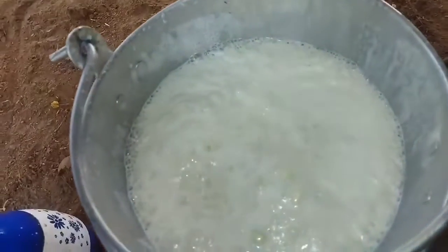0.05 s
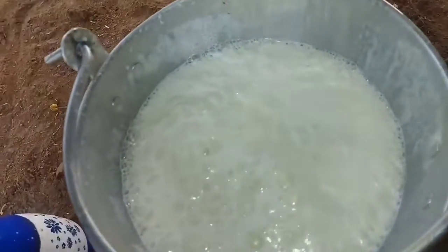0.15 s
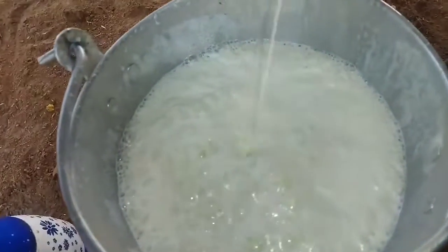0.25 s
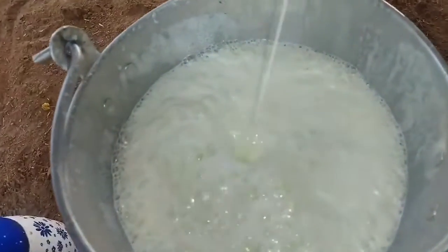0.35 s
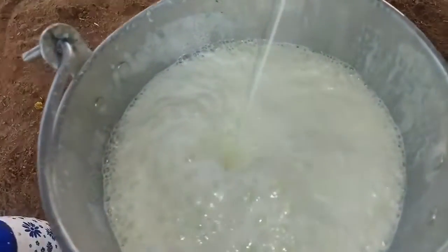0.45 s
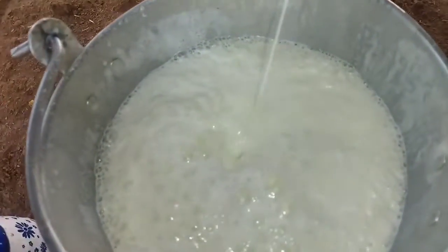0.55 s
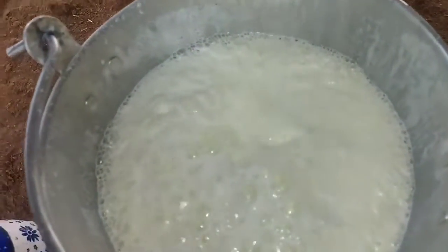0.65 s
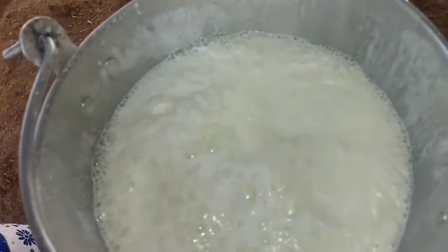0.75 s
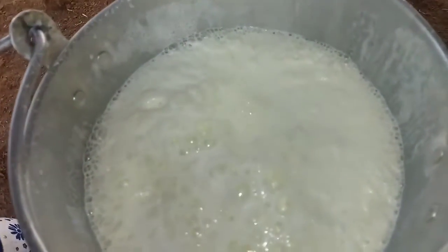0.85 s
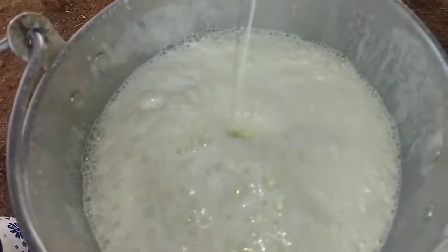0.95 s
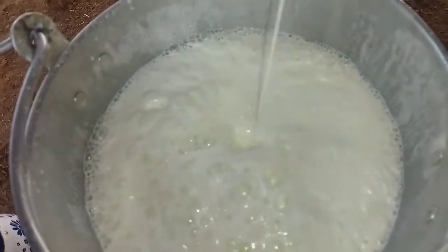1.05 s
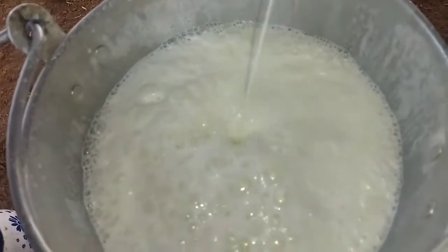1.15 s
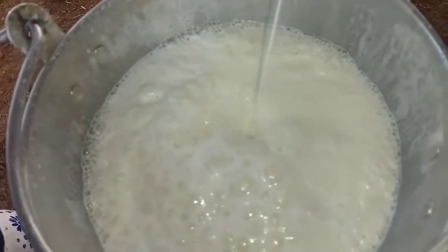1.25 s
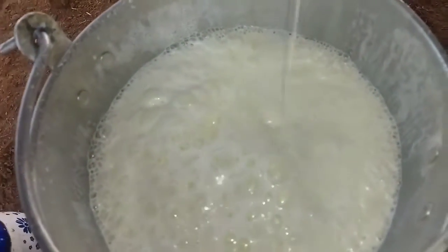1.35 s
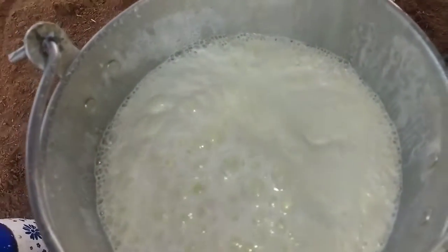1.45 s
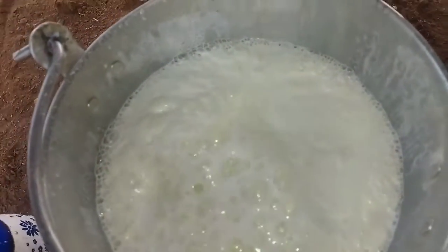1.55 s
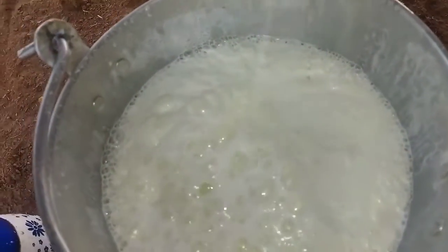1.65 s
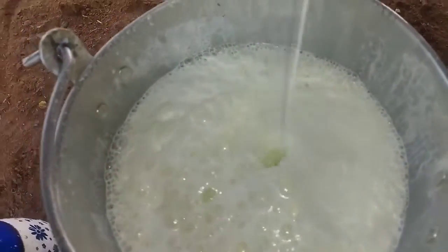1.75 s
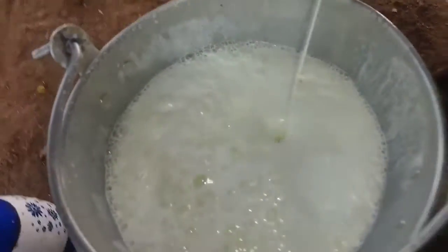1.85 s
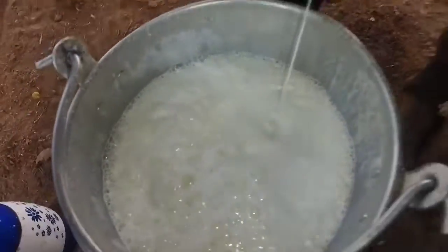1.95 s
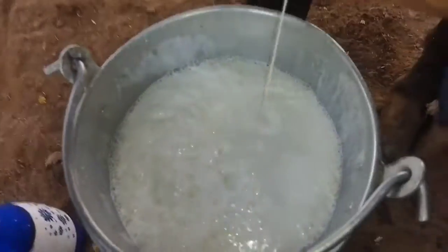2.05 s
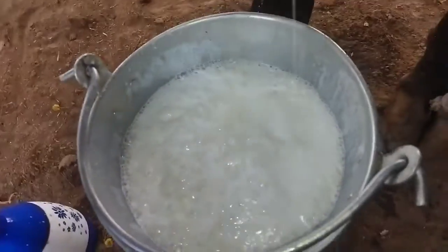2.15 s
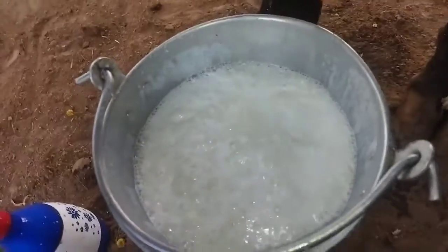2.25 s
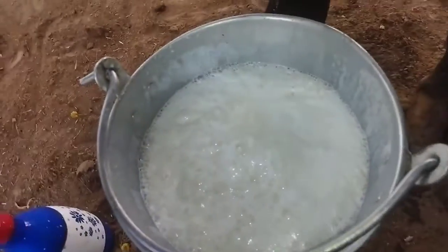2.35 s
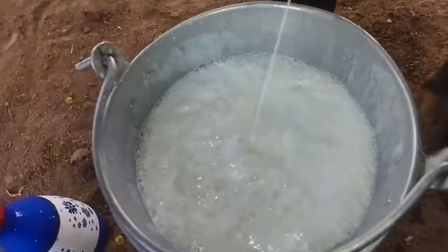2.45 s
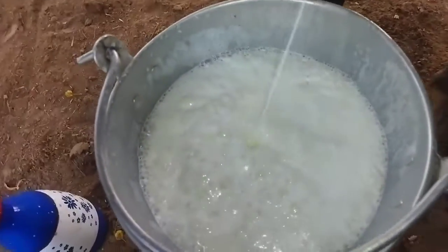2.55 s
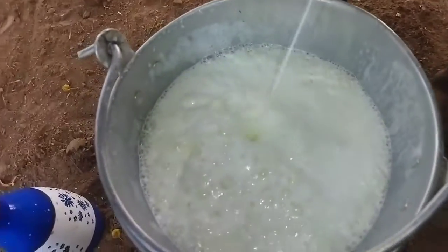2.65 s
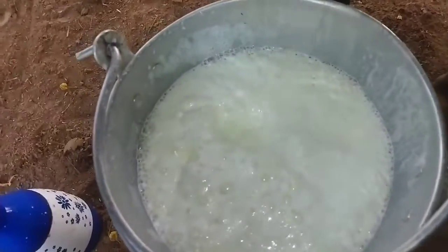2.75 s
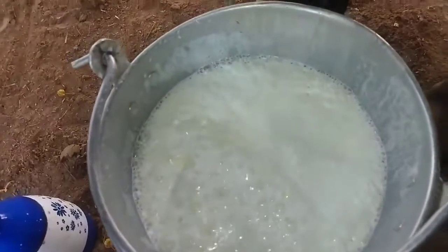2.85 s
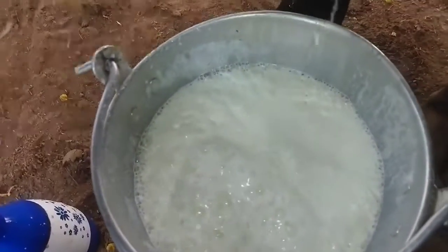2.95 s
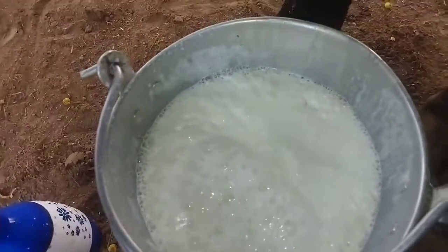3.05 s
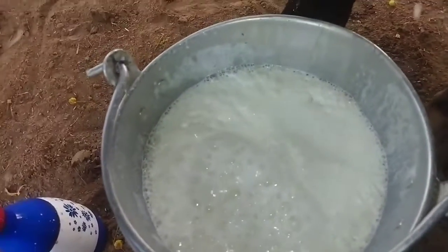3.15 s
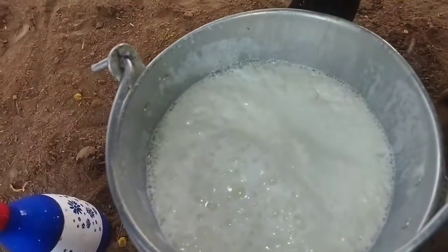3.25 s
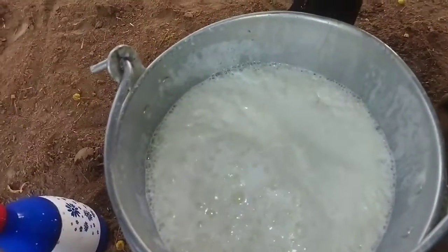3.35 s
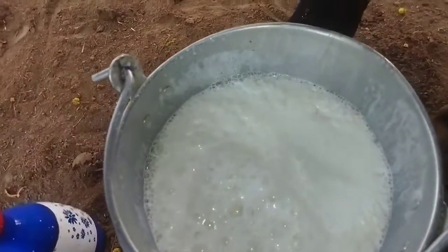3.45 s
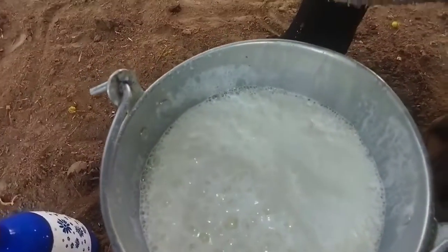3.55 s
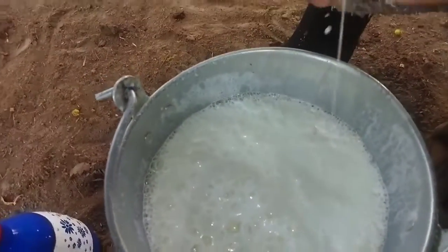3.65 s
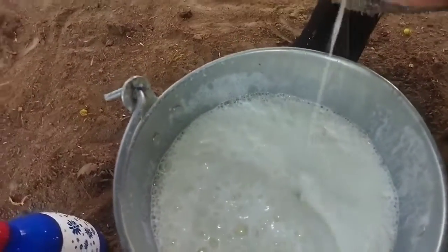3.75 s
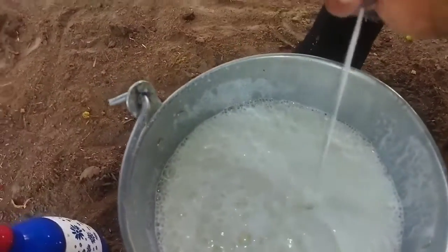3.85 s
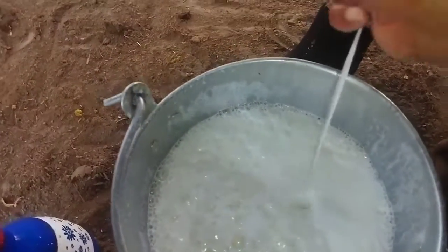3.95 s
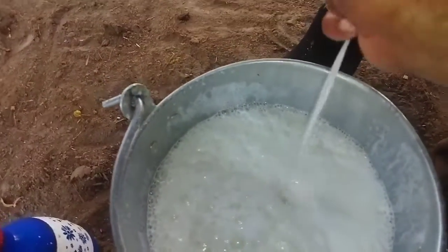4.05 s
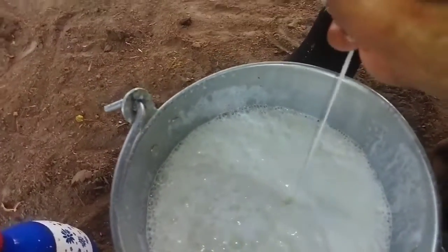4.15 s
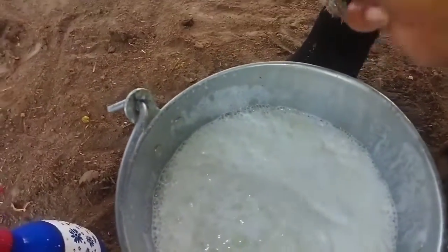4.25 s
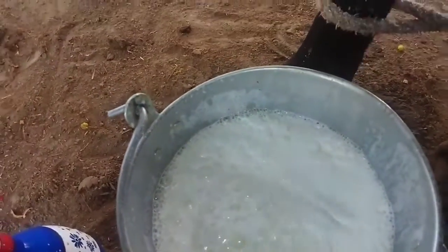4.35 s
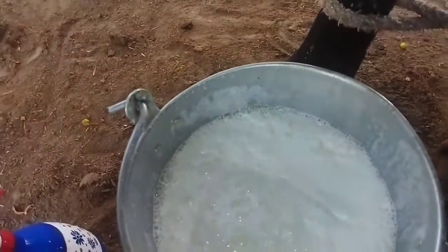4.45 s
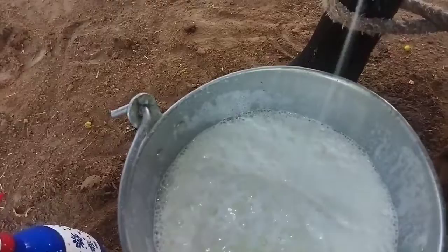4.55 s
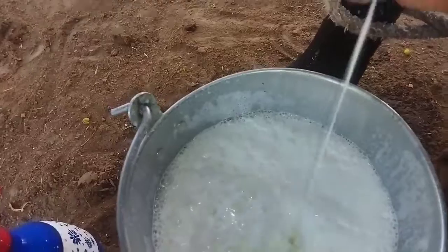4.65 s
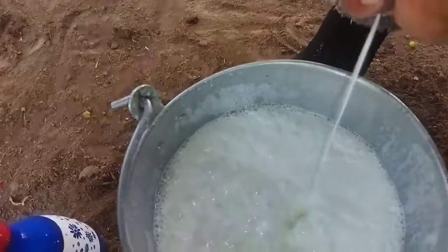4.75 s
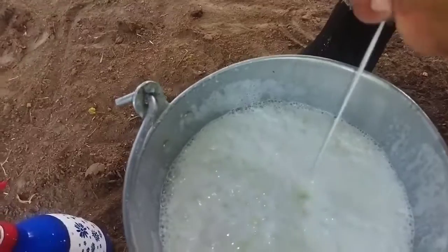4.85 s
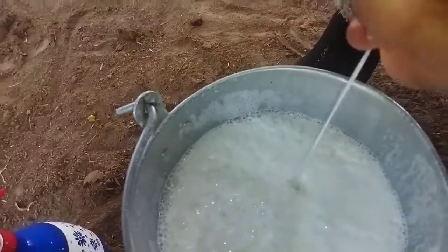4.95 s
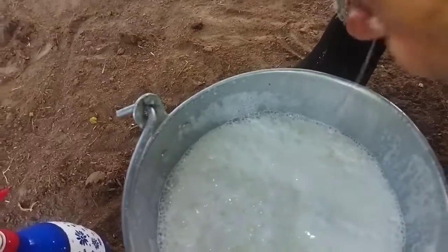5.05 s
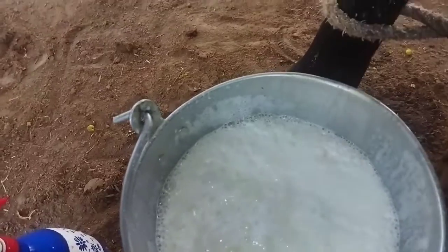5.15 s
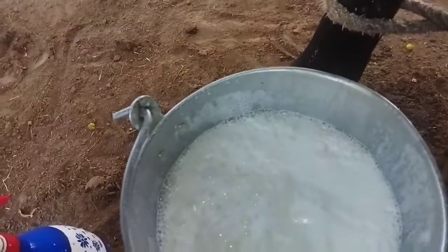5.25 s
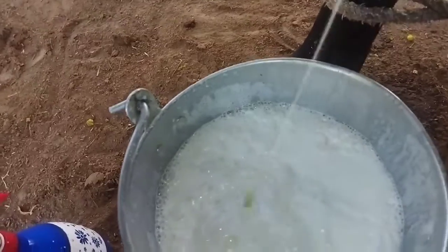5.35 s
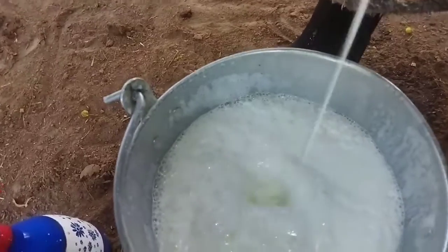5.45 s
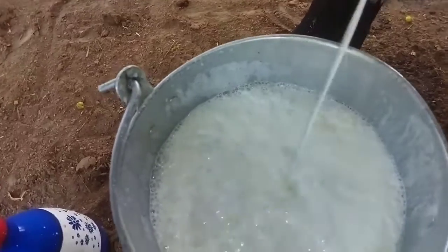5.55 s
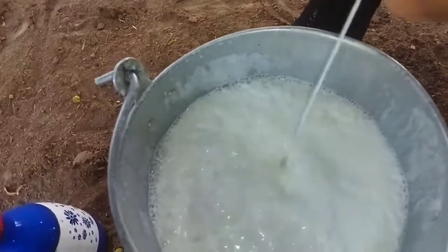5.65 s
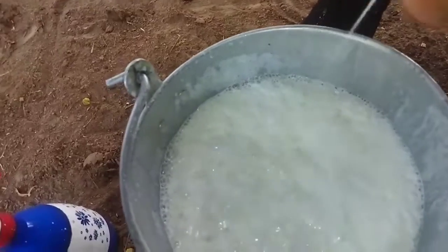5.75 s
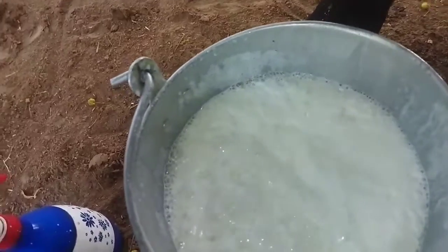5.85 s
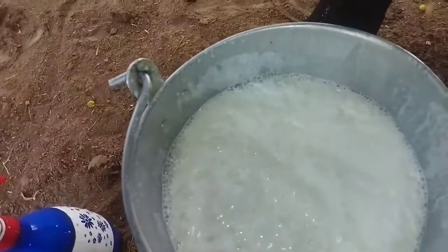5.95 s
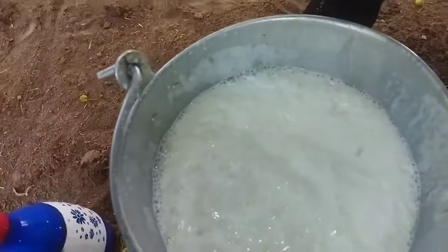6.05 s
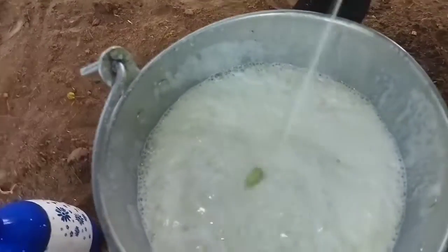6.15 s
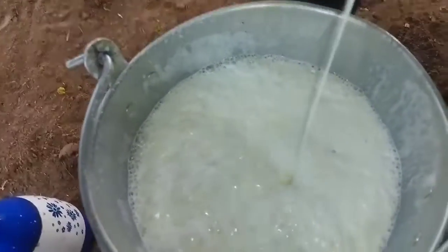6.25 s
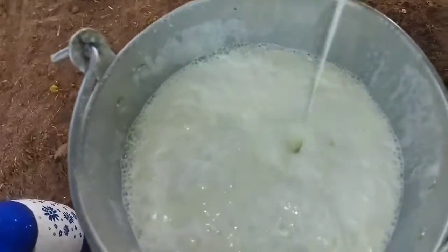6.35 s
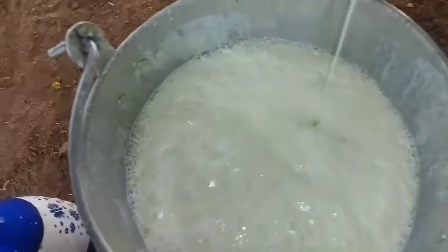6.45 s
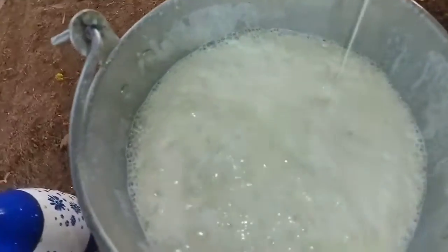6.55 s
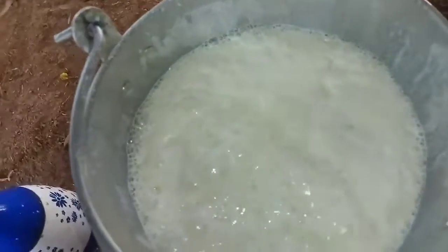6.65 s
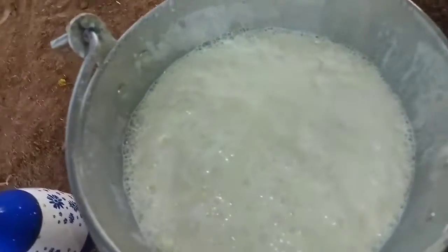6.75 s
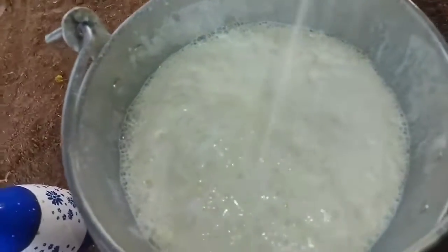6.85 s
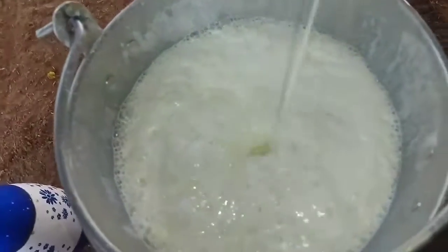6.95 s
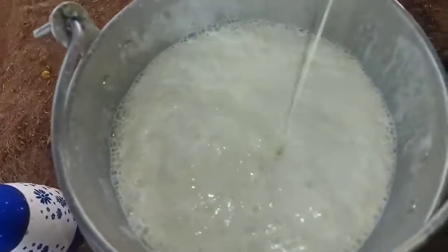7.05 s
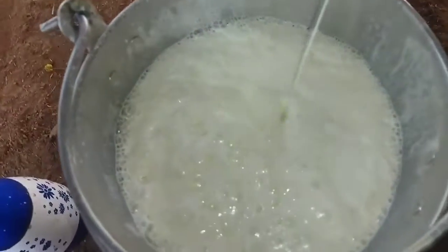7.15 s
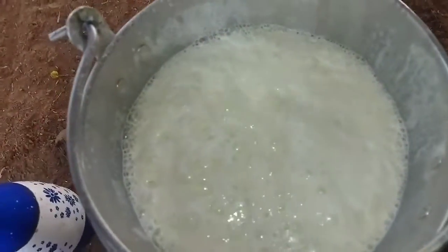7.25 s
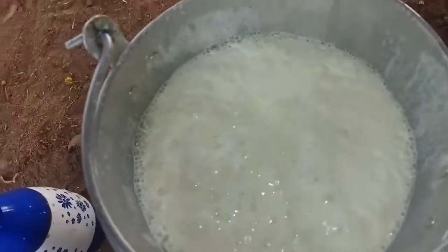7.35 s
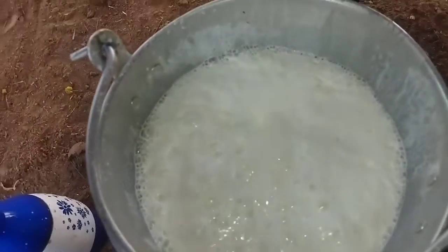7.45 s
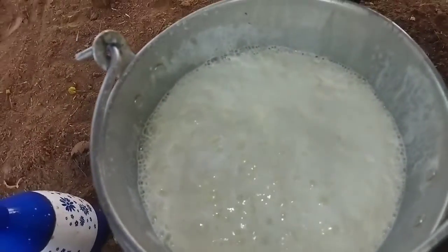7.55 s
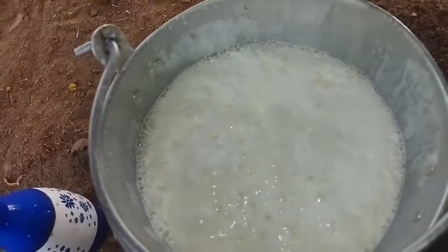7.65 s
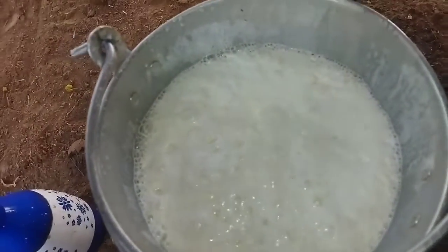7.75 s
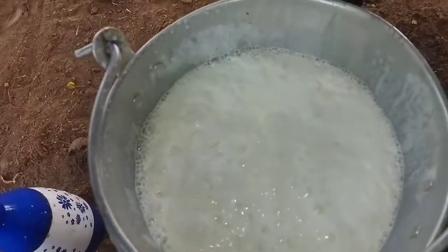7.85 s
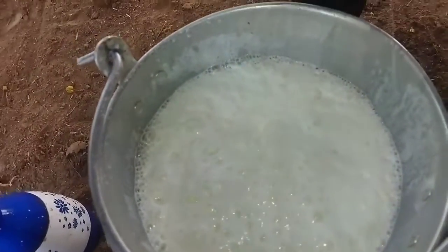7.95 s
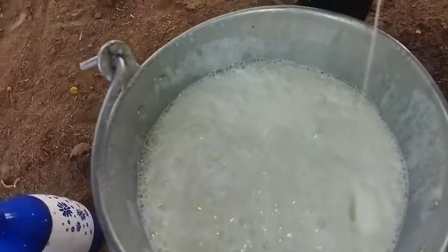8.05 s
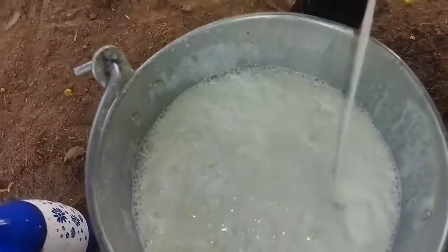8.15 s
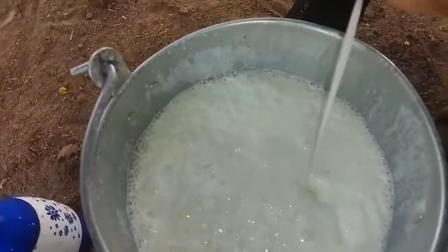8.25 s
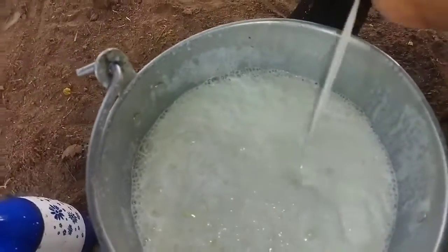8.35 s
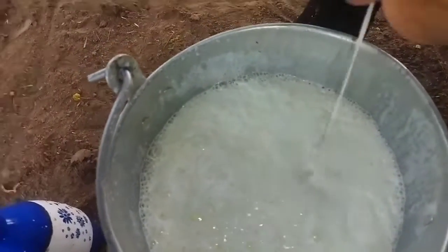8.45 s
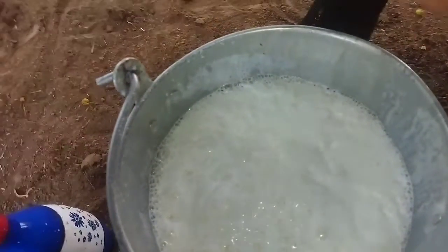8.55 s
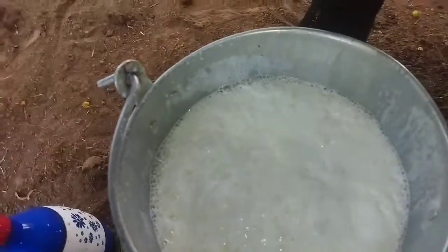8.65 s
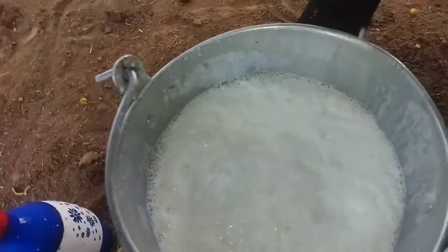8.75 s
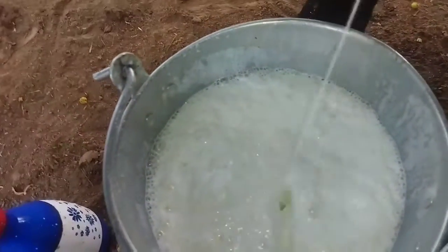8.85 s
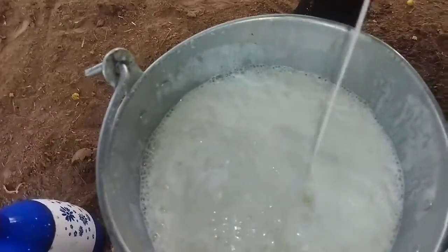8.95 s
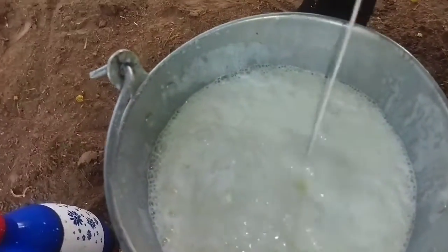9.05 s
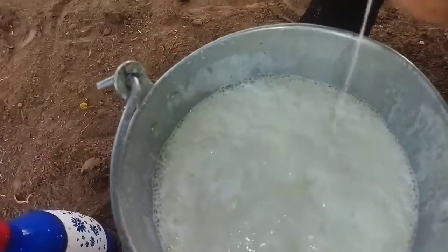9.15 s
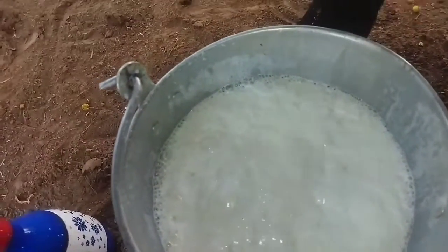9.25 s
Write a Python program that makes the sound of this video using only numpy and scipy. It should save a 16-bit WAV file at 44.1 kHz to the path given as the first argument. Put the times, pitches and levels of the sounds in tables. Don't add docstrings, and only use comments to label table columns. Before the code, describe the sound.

Steady hand milking heard right over a foam-filled pail outdoors. Each squirt starts with a small splat, swells into hissing spray and hollow bubbling, then stops abruptly, leaving soft crackle and knocks of froth. Two longer pauses break the rhythm. Behind it are soft air hiss, a faint distant engine throb, barely audible bird whistles and one short far-off low from a cow.

```python
import sys
import numpy as np
from scipy import signal
from scipy.fft import rfft, irfft
from scipy.io import wavfile
from scipy.ndimage import uniform_filter1d

SR = 44100
rng = np.random.default_rng(int(sys.argv[2]) if len(sys.argv) > 2 else 0)


def voltage_ratio(decibels):
    exponent = np.asarray(decibels, float) / 20
    return 10 ** exponent


def materialize(psi):
    bounded = np.clip(np.atleast_2d(psi).T, -1, 1)
    quanta = np.round(bounded * 32767).astype(np.int16)
    wavfile.write(sys.argv[1], SR, quanta)


N = 409688
T = np.arange(N) / SR

# [t/s, firings per second/Hz]
ENGINE_SPEED = [(0.0, 20.73), (0.8, 20.0), (1.6, 18.42), (2.4, 18.62), (3.2, 18.96), (4.0, 18.66),
                (4.8, 18.66), (5.6, 19.16), (6.2, 18.83), (6.8, 19.83), (7.4, 21.3), (8.0, 20.62),
                (8.6, 19.89), (9.3, 19.37)]
FIRST_TURN = -.54
# [f/Hz, level/dB]
YARD_SPECTRUM = [(24, -56), (40, -40), (146, 6), (408, -12.5), (578, -16), (953, -11), (1160, -13.5),
                 (1780, -15), (2400, -17), (3670, -15.5), (7020, -26), (7560, -28.5), (11900, -26.5),
                 (15600, -21.5)]
YARD_DB = -53.5
# [f/Hz, correlation]
YARD_LIKENESS = [(40, 0.51), (120, 0.94), (240, 0.98), (950, 0.21), (3770, 0.025), (15000, 0.13)]
# [start t/s, length/s, f/Hz, level/dB, blur/Hz]
CHIRPS = [
    (3.192, 0.16, 2700, -66, 60),
    (3.578, 0.049, 1920, -55.5, 500),
    (5.965, 0.099, 3500, -57, 80.4),
]
# [t/s, f/Hz, level/dB]
COW_LOW = [
    (7.69, 234, -72),
    (7.708, 236, -50),
    (7.894, 269, -48.5),
    (7.96, 260, -56),
]
# [t/s, level/dB]
RUSTLE = [
    (3.45, -82),
    (3.724, -41),
    (3.774, -88),
    (3.79, -68),
]
# [t/s, level/dB]
SLOSH = [(.89, -48), (1.63, -44.5), (2.35, -78), (3.07, -57), (3.37, -38), (3.55, -56), (4.7, -69),
         (5.46, -42.5), (6.01, -42), (6.11, -43.5), (6.85, -39), (6.9, -32), (6.988, -48), (7.442, -49),
         (8.74, -43.5), (8.88, -43.5)]
LURCH_DB_PER_S, SETTLE_DB_PER_S = 300, 95
# [t/s, peak level/dB, bubble f/Hz, splat level/dB re peak]
SLUGS = [(0.381, -16.5, 929, 1), (0.408, -17, 700, -22), (1.11, -6.5, 750, -14.5), (1.142, -10.5, 660, -23),
         (1.872, -22, 1300, -16), (1.972, -19.5, 355, -8), (2.104, -21, 890, -7), (2.581, -31, 930, 13.5),
         (2.616, -15.5, 390, -7), (3.346, -30.5, 455, -32), (3.389, -39, 382, -28), (3.911, -32.5, 383, -8),
         (4.414, -22.5, 891, -45), (5.14, -29, 300, 12), (5.568, -16.5, 420, -20), (5.596, -5.5, 970, -24),
         (6.345, -23, 820, 1), (6.558, -13, 838, -24), (7.082, -13, 926, -2.5), (7.385, -44, 956, 20),
         (7.438, -28.5, 1200, -16), (8.233, -37, 690, 10), (9.025, -35, 710, 3), (9.044, -24, 440, 12.5),
         (9.067, -21, 387, -23)]
TICK_DB, TICK_HZ, TICK_SPLAT_DB, SLOW_START_S = 12.5, 960, 8, .029
# [first drop t/s, thin thread lasts/s]
JETS = [(-.35, .05), (.323, .052), (1.071, .038), (1.823, .05), (2.555, .06), (3.787, .124), (4.732, .055),
        (5.507, .058), (6.284, .04), (7.033, .047), (8.138, .094), (9.001, .041)]
# [lets go after/s, spray level/dB, tightens/(dB/s), dies away/(dB/s)]
HAND = [(0.38, -46.5, -9, 302), (0.4, -39, -14.5, 239), (0.37, -39, -3, 173), (0.32, -38.5, -11.5, 124),
        (0.37, -40.5, -9, 600), (0.53, -38, 15.5, 233), (.43, -35, -9.5, 259), (0.42, -35.5, -14, 461),
        (.38, -38, -11.5, 204), (0.37, -41.5, -29.5, 600), (0.47, -41.5, 18, 300), (0.26, -40, -19, 200)]
# [fizz, gurgle, drum level/dB re spray, air cavity f/Hz]
LANDING = [(3, 5.5, 1, 760), (1.5, 2.5, -2.5, 700), (2.5, 1.5, -1.5, 700), (1.5, -0.5, -2, 760),
           (0, 1, -1, 720), (-0.5, -3.5, -3.5, 720), (-1, -6, -5, 750), (0, -5, -5.5, 830),
           (1.5, 1, -2.5, 770), (4, 3, -1.5, 760), (-1, -2, -2.5, 750), (1, 0.5, 1.5, 720)]
# [peak t/s, spray level/dB, froth level/dB]
SURGES = [(.4, -8, 3), (.672, -4.5, 3), (.72, -3, -0.5), (1.45, 1, 0.5), (1.515, -2.5, 4.5),
          (1.189, 1.5, 5.5), (1.38, 4, 0.5), (1.977, 7.5, 2.5), (2.1, 6.5, 5.5), (2.8, 4, 1.5),
          (4.0, 1.5, 2.5), (4.31, 0.5, -4.5), (4.798, 3.5, 1.5), (4.971, 6.5, 4.5), (5.13, 5, -1.5),
          (5.592, -1, 6.5), (5.76, 0, -2.5), (5.89, 7.5, 4), (6.385, 2.5, 0), (6.53, 5.5, 4),
          (7.135, 3.5, -1.5), (7.331, 10.5, 10.5), (8.318, 5, 7.5), (8.418, 5.5, 7.5), (8.6, -7, -2),
          (9.1, 2.5, -1.5), (9.17, 3, 1.5)]
SURGE_S = 0.022
# [f/Hz, level/dB]
SPRAY_SPECTRUM = [(820, -31), (1400, 23.5), (1880, 10.5), (2320, 6.5), (2700, 2), (4160, 5.5), (7100, -8),
                  (11100, -7), (12000, -6.5), (14700, 0), (15600, 3.5)]
THREAD_DB, BUILD_DB_PER_S, THREAD_BODY_DB = -5, 115, -6
GAP_DB, GAP_S = 4, .009
ARCH_DB, KNEE_S = 0.5, 0.015
PUNCH_DB, PUNCH_S = 2.5, 0.022
LINGER_DB, DRUM_FADE = 5.5, 0.96
FIZZ_SHARE = 0.29
CRACKLE_DB, CRACKLE_DB_PER_S = -20, 65
# [left delay/ms, right delay/ms, wander/ms, level/dB]
WALL = [
    (.3, .36, .04, -11),
    (.7, .62, .07, -11),
    (1.3, 1.42, .12, -10),
    (2.3, 2.15, .15, -10),
]
# [f/Hz, phase/radians]
PORT_LEAD = [(130, 0), (250, 0.48), (700, 0.56), (1500, 0.0013), (3000, 0)]
# [f/Hz, level/dB]
PORT_RESPONSE = [(20, -18), (60, -5.5), (100, -6.5), (170, -1.5), (11000, -5.5), (11350, -7.5), (11650, -1),
                 (15400, -5), (15750, -24), (16400, -72)]
# [f/Hz, level difference/dB]
PORT_LEAN = [(300, 0), (400, 2), (700, -2.5), (1300, 1.5), (2400, 3), (4400, 5), (8000, 6), (15000, 11)]
# [f/Hz, level/dB re neighbours]
FAINTEST_HELD = [(1000, -22), (2000, -8.5), (3000, -6), (5000, -5.5), (7000, -3.5), (11000, -4),
                 (15000, -5)]


def evened(x):
    return x / np.sqrt(np.mean(x ** 2) + 1e-20)


def read(points, hz):
    f, value = np.transpose(points)
    return np.interp(np.log(hz + 1), np.log(f + 1), value)


def coloured(x, points, lo_hz, hi_hz):
    hz = np.fft.rfftfreq(N, 1 / SR)
    edge = 1 / np.sqrt((1 + (lo_hz / (hz + 1)) ** 12) * (1 + (hz / hi_hz) ** 12))
    return evened(irfft(rfft(x) * voltage_ratio(read(points, hz)) * edge, N))


def drift(t, hz):
    rates = np.geomspace(hz / 10, hz, 20)
    return evened(sum(np.sin(2 * np.pi * (f * t + rng.random())) / np.sqrt(f) for f in rates))


def clicks(per_s, spread_db):
    size = voltage_ratio(spread_db * np.minimum(rng.exponential(1, N), 4)) * rng.choice([-1, 1], N)
    return size * (rng.random(N) < per_s / SR)


def bubble(hz, turns, glide):
    u = np.arange(int(4 * turns * SR / hz)) * hz / SR / turns
    ring = np.sin(2 * np.pi * turns * (u + glide * u ** 2 / 2))
    return ring * np.exp(-u) * np.tanh(u * turns) * np.sqrt(hz / turns)


def bubbles(lo_hz, hi_hz, centre_hz, octaves, per_s, spread_db, turns, glide, count=16):
    sizes_hz = np.geomspace(lo_hz, hi_hz, count)
    away = np.log2(sizes_hz[:, None] / centre_hz[::64]) / octaves
    odds = np.exp(-.5 * away ** 2) + 0.078
    odds = np.repeat(odds / odds.sum(0), 64, axis=1)[:, :N]
    swarm = 0
    for hz, share in zip(sizes_hz, odds):
        swarm = swarm + signal.oaconvolve(clicks(per_s * share, spread_db), bubble(hz, turns, glide))[:N]
    return evened(swarm)


def yard():
    frames, hz = N // 256 + 5, np.fft.rfftfreq(1024, 1 / SR)
    a, b, c, d, patches = rng.standard_normal((frames, 513, 5)).T
    patches = evened(uniform_filter1d(uniform_filter1d(patches, size=10, axis=0), size=12, axis=1))
    same = np.clip(read(YARD_LIKENESS, hz), -1, 1)[:, None]
    left = a + 1j * b
    right = same * left + np.sqrt(1 - same ** 2) * (c + 1j * d)
    z = np.array([left, right]) * voltage_ratio(read(YARD_SPECTRUM, hz)[:, None] + 1.7 * patches)
    return voltage_ratio(YARD_DB) * evened(signal.istft(z, nperseg=1024, noverlap=768)[1][:, :N])


def engine():
    turns = FIRST_TURN + np.cumsum(np.interp(T, *np.transpose(ENGINE_SPEED))) / SR
    fired = np.diff(np.floor(turns), prepend=0) > 0
    t = np.arange(-600, 2400) / SR
    out = np.zeros(N)
    which = rng.integers(0, 4, N)
    for k, hz in enumerate((117, 142.6, 144.5, 149)):
        shape = np.exp(-.5 * (t / 0.0055) ** 2) + 0.064 * np.exp(-abs(t - .012) / 0.023)
        thud = shape * np.sin(2 * np.pi * (hz * t + rng.random()))
        strength = voltage_ratio(0.24 * rng.standard_normal(N))
        out += signal.oaconvolve(fired * (which == k) * strength, thud)[600:N + 600]
    return voltage_ratio(-43) * out


def chirps():
    out = np.zeros(N)
    for s, length, hz, db, blur_hz in CHIRPS:
        wobble = evened(uniform_filter1d(rng.standard_normal(N), size=100))
        swell = np.sin(np.pi * np.clip((T - s) / length, 0, 1))
        out += voltage_ratio(db) * swell * np.sin(2 * np.pi * np.cumsum(hz + blur_hz * wobble) / SR)
    return out


def cow():
    s, hz, db = np.transpose(COW_LOW)
    tone = np.sin(2 * np.pi * np.cumsum(np.interp(T, s, hz)) / SR)
    level = voltage_ratio(uniform_filter1d(np.interp(T, s, db, -110, -110), size=600))
    return np.sqrt(2) * level * tone


def rustle():
    grains = [coloured(clicks(per_s=8200, spread_db=-5.0), SPRAY_SPECTRUM, 2300, 16000) for port in "lr"]
    level_db = np.interp(T, *np.transpose(RUSTLE), -120, -120)
    return voltage_ratio(level_db - 13.5) * np.array(grains)


def slosh():
    knocks = bubbles(250, 520, np.full(N, 370.), octaves=0.18, per_s=88, spread_db=3.0,
                     turns=4.8, glide=0.013, count=8)
    level = 0
    for s, db in SLOSH:
        away_db = np.maximum(LURCH_DB_PER_S * (s - T), SETTLE_DB_PER_S * (T - s))
        level = level + voltage_ratio(db - away_db - 8.5)
    return level * knocks


def slugs():
    out, t = np.zeros(N + SR), np.arange(600) / SR
    lumps = []
    for (s, thread), (held, db, *grip) in list(zip(JETS, HAND))[1:]:
        lumps.append((s, db + TICK_DB - (thread / SLOW_START_S) ** 2, TICK_HZ, TICK_SPLAT_DB))
    lumps.extend(SLUGS)
    for s, db, hz, splat_db in lumps:
        at = round(s * SR)
        for size, ring_db in ((0.972, -3.0), (0.614, -33), (1.49, -9)):
            ring = bubble(hz * size, turns=1.3, glide=.04)
            out[at:at + len(ring)] += voltage_ratio(db + ring_db) * ring / abs(ring).max()
        noise = rng.standard_normal(600)
        splat = (noise - uniform_filter1d(noise, size=24)) * np.exp(-t / .002)
        out[at:at + 600] += voltage_ratio(db + splat_db - 9) * splat
    return out[:N]


def squeeze():
    which = np.searchsorted(np.transpose(JETS)[0], T, side="right") - 1
    start, thread = np.transpose(JETS)[:, which]
    held, db, tighten, dying = np.transpose(HAND)[:, which]
    fizz_db, gurgle_db, drum_db, cavity_hz = np.transpose(LANDING)[:, which]
    u = T - start
    thin = u < thread

    def fade(late):
        return dying * KNEE_S * np.logaddexp(0, (u - held - late) / KNEE_S)

    flow = db + thin * (THREAD_DB - BUILD_DB_PER_S * (thread - u))
    flow += tighten * (np.minimum(u, held) - held / 2)
    flow -= GAP_DB * np.exp(-.5 * ((u - GAP_S) / (GAP_S / 2)) ** 2)
    peak, *swell = np.transpose(SURGES)
    spray_surge, froth_surge = swell @ np.exp(-.5 * ((T - peak[:, None]) / SURGE_S) ** 2)

    spray = flow + spray_surge + ARCH_DB * np.sin(np.pi * np.clip(u / held, 0, 1))
    spray -= np.minimum(fade(0), CRACKLE_DB_PER_S * abs(u - held) - CRACKLE_DB)
    fizz = spray + fizz_db - (1 - FIZZ_SHARE) * spray_surge
    punch = PUNCH_DB * np.exp(-abs(u - thread) / PUNCH_S)
    body = flow + froth_surge + np.where(thin, THREAD_BODY_DB * (1 - u / thread), punch)
    closing = fade(LINGER_DB / dying)
    return spray, fizz, body + gurgle_db - closing, body + drum_db - DRUM_FADE * closing, cavity_hz


def jets():
    spray_db, fizz_db, gurgle_db, drum_db, cavity_hz = squeeze()
    flutter = np.interp(T, T[::64], drift(T[::64], hz=70.33))
    shared, *own = (evened(clicks(per_s=2000, spread_db=3.5)) + 1.06 * rng.standard_normal(N)
                    for k in range(3))
    drops = shared + 0.82 * np.array(own)
    spray = voltage_ratio(spray_db) * coloured(drops, SPRAY_SPECTRUM, 2320, 7140)
    spray += voltage_ratio(fizz_db) * coloured(drops, SPRAY_SPECTRUM, 7440, 16000)
    gurgle = bubbles(480, 1400, cavity_hz, octaves=0.3, per_s=900, spread_db=1.5, turns=3.17, glide=0.16)
    fine_froth = coloured(drops, [(400, 3.5), (1800, -11.5)], 545, 2220)
    gurgle = gurgle + 0.37 * fine_froth
    drum = bubbles(190, 420, np.full(N, 300.), octaves=0.45, per_s=220, spread_db=3.0,
                   turns=2.41, glide=0.064)
    body = voltage_ratio(gurgle_db + 4.5) * gurgle + voltage_ratio(drum_db + 1.5) * drum
    return voltage_ratio(0.44 * flutter + 2.0) * spray + voltage_ratio(0.87 * flutter) * body


def bucket(x):
    hz, t, z = signal.stft(x, SR, nperseg=1024, noverlap=896)
    turn = -2j * np.pi * hz[:, None]
    paths = np.ones(z.shape, complex)
    sweep = .00005 * drift(t, hz=8.)
    paths[1] = np.exp(1j * read(PORT_LEAD, hz))[:, None] * np.exp(turn * sweep)
    for left_ms, right_ms, wander_ms, db in WALL:
        for path, ms in zip(paths, (left_ms, right_ms)):
            delay = abs(ms + wander_ms * drift(t, hz=3.)) / 1000
            path += voltage_ratio(db) * np.exp(turn * delay)
    paths /= np.sqrt(uniform_filter1d(abs(paths) ** 2, size=60, axis=1))
    return signal.istft(paths * z, SR, nperseg=1024, noverlap=896)[1][:, :N]


def scene():
    background = yard() + engine() + chirps() + cow() + rustle()
    return background + bucket(slosh() + slugs() + jets())


def thinned(x):
    mid_side = np.array([x[0] + x[1], x[0] - x[1]]) / 2
    hz, t, z = signal.stft(mid_side, SR, nperseg=1024, noverlap=768)
    near = uniform_filter1d(uniform_filter1d(abs(z) ** 2, size=5, axis=1), size=11, axis=2)
    over_db = 10 * np.log10(abs(near / uniform_filter1d(near, size=40, axis=1)) + 1e-9)
    chance = uniform_filter1d(rng.standard_normal(z.shape), size=5, axis=1)
    chance = evened(uniform_filter1d(chance, size=16, axis=2))
    lost = over_db + 2.2 * chance < read(FAINTEST_HELD, hz)[:, None]
    lost = uniform_filter1d(1. * lost, size=3, axis=1) > .3
    gain_db = .5 * np.clip(over_db, -6, 6) - 40 * lost
    peak_db = 10 * np.log10(abs(z) ** 2 / abs(near) + 1e-3)
    gain_db += .65 * np.clip(hz[:, None] / 5000, 0, 1) * peak_db
    z = z * voltage_ratio(gain_db * (hz[:, None] > 900))
    mid, side = signal.istft(z, SR, nperseg=1024, noverlap=768)[1][:, :N]
    return np.array([mid + side, mid - side])


def roll_off(x):
    return signal.sosfilt(signal.butter(12, 16850, fs=SR, output="sos"), x)


def record(dry):
    hz = np.fft.rfftfreq(N, 1 / SR)
    lean_db = np.array([[.5], [-.5]]) * read(PORT_LEAN, hz)
    ports = irfft(rfft(dry) * voltage_ratio(read(PORT_RESPONSE, hz) + lean_db), N)
    mix = thinned(ports)
    return roll_off(mix)


dry = scene()
out = record(dry)
materialize(out)
```